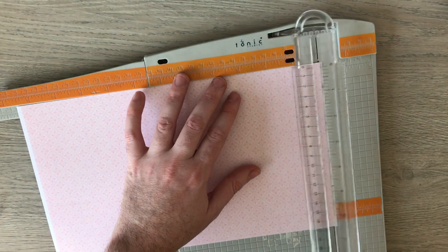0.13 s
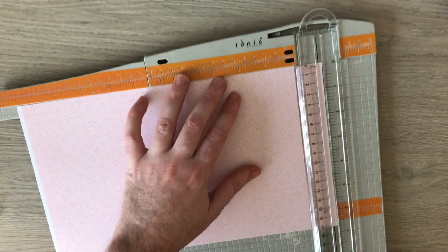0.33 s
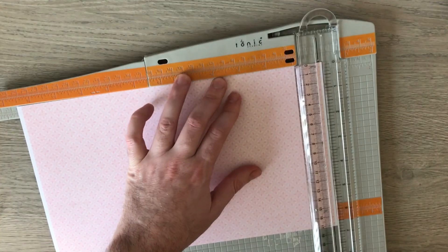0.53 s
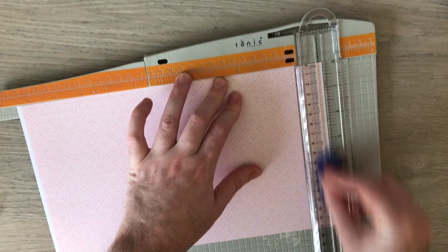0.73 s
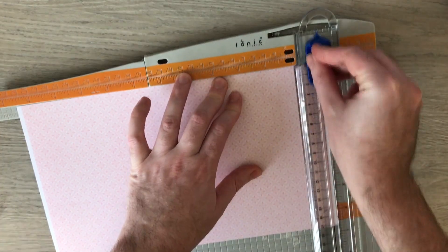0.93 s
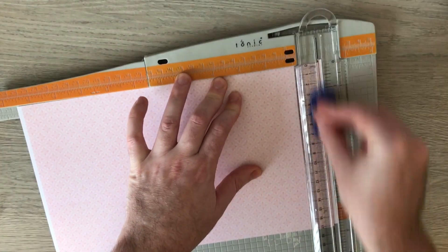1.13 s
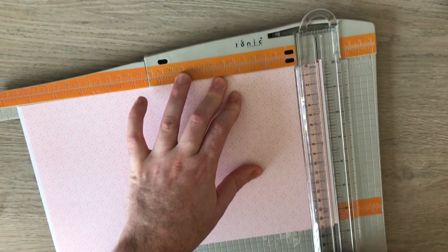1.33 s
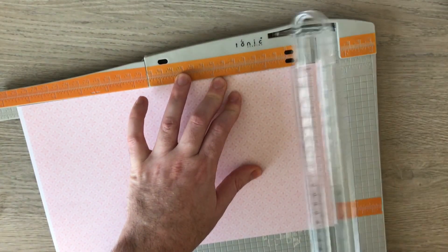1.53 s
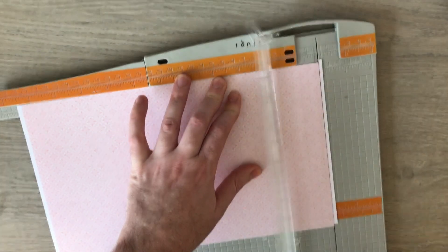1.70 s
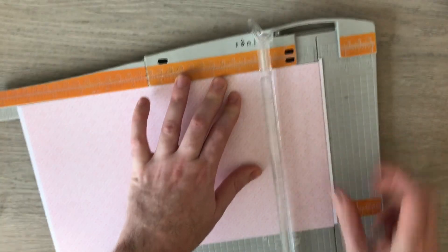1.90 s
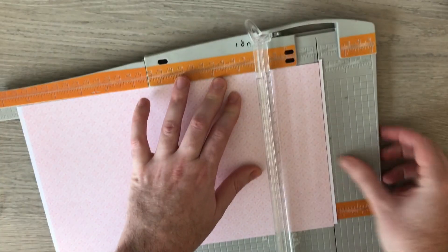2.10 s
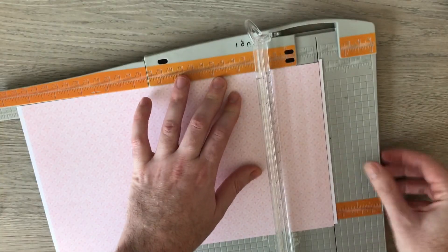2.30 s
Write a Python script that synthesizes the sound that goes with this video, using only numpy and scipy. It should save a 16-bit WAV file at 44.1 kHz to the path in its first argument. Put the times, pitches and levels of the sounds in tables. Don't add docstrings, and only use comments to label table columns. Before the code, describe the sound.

A paper trimmer's plastic rail squeaks faintly and slaps shut, the blade carriage hisses up through card and slides back more softly, then the rail flips open with rattling ticks; close phone microphone, small quiet room.

```python
import sys
import numpy as np
from scipy import signal
from scipy.fft import rfft, irfft
from scipy.io import wavfile
from scipy.ndimage import uniform_filter1d

SR = 44100
rng = np.random.default_rng(int(sys.argv[2]) if len(sys.argv) > 2 else 0)


def invert_db(x):
    u = np.asarray(x, float) / 20
    return 10 ** u


def dump_mix(stems):
    frames = np.atleast_2d(stems).T
    limited = np.clip(frames, -1, 1)
    pcm = np.round(limited * 32767).astype(np.int16)
    wavfile.write(sys.argv[1], SR, pcm)


N = 103635
T = np.arange(N) / SR


def hiss():
    return rng.standard_normal(N)


def unit(x):
    return x / np.sqrt(np.mean(x ** 2))


def colour(x, tone):
    hz, db = np.array(tone, float).T
    octaves = np.log2(np.fft.rfftfreq(N, 1 / SR) + 1)
    below = np.maximum(np.log2(hz[0]) - octaves, 0)
    gain = invert_db(np.interp(octaves, np.log2(hz), db) - 24 * below)
    return irfft(rfft(x) * unit(gain), N)


def ring(x, modes):
    t = T[:SR // 2]
    response = 0
    for k, (hz, db, t60) in enumerate(modes):
        fade = 1000. ** (-t / t60) / np.sqrt(t60)
        response = response + (-1) ** k * invert_db(db) * np.sin(2 * np.pi * hz * t) * fade
    return signal.fftconvolve(x, response / np.sqrt(np.sum(response ** 2)))[:N]


def damped(modes, share):
    return [(hz, db, share * t60) for hz, db, t60 in modes]


def bursts(times, dbs, t60, rise_s):
    level = np.zeros(N)
    for start, db in zip(times, dbs):
        age = np.maximum(T - start, 0)
        level += invert_db(db) * (1 - np.exp(-age / rise_s)) * 1000. ** (-age / t60)
    return level * np.sign(hiss())


def walk(rate):
    k = int(SR / rate)
    return unit(uniform_filter1d(uniform_filter1d(hiss(), k), k))


def curve(times, dbs):
    return invert_db(np.interp(T, times, dbs, left=-120, right=-120))


# pitch in Hz, level in dB.
AIR_TONE = [(15, -36), (25, -3.5), (120, -8.5), (170, -11.5), (624, -25.5), (1100, -18.5), (1290, -28),
            (1610, -30), (16000, -43.5)]


def quiet_air():
    return invert_db(-60 + 0.64 * walk(16)) * colour(hiss(), AIR_TONE)


# pitch in Hz, level in dB, extra level in the hum in dB.
HINGE_TONES = [(935, -3, 0), (1865, -24, -20), (711, -18, 7), (1350, -24, -15), (1160, -22, -10)]


def squeak():
    start_s, end_s, chirp_width_s = 0.032, 0.132, 0.011
    chirp = np.exp(-((T - start_s) / chirp_width_s) ** 2)
    humming = (T > start_s) * (T < end_s)
    hum = uniform_filter1d(invert_db(-16 + 2 * walk(40)) * humming, size=300)
    rub = 0
    for hz, db, hum_db in HINGE_TONES:
        wobbly_time = T + 0.00005 * walk(40)
        rub = rub + invert_db(db) * (chirp + invert_db(hum_db) * hum) * np.sin(2 * np.pi * hz * wobbly_time)
    return invert_db(-46 + 3.5) * rub


# pitch in Hz, level in dB, time to fade by 60 dB in seconds.
TABLE_MODES = [(65.5, -22, 0.21), (130.9, 6, 0.23), (175.3, -6, 0.073), (208.5, -1, 0.14),
               (287.5, -6, 0.15), (370, -10.5, 0.062)]


def thud(times, dbs):
    push_s = 0.0024
    pushes = 0
    for start, db in zip(times, dbs):
        pushes = pushes + invert_db(db) * np.sin(np.pi * np.clip((T - start) / push_s, 0, 1)) ** 2
    return signal.lfilter(*signal.butter(2, 80, "high", fs=SR), ring(pushes, TABLE_MODES))


# time in seconds, board level in dB, crack level in dB.
FALL = [
    (.17, -78, -85),
    (.195, -66, -74),
    (.21, -54, -62),
    (.216, -60, -66),
    (.22, -63, -54),
    (.226, -62, -64),
    (.233, -56, -54),
    (.24, -58, -60),
]
# start in seconds, crack level in dB, board level in dB, table level in dB.
SLAP = [
    (0.2408, -4, -30.5, -23),
    (0.2459, -18.5, -26, -34),
    (.2595, -32, -27.5, -41),
]
# pitch in Hz, level in dB.
SLAP_TONE = [(290, -60.5), (500, -14), (1110, 0.5), (3660, -5), (5970, -10.5), (8820, -13), (10500, -13.5),
             (12800, -10.5), (15700, -17.5)]
# pitch in Hz, level in dB.
SHIVER_TONE = [(180, -19.5), (300, -5.5), (372, -4), (477, -11), (824, 2), (1400, -2.5), (6110, -12.5),
               (10300, -24.5), (13500, -24.5), (15700, -25.5)]
# pitch in Hz, level in dB, time to fade by 60 dB in seconds.
BOARD_MODES = [(583, -7.5, 0.036), (689, -2.5, 0.054), (813, 1, 0.024), (1008, 5, 0.029), (1158, 4, 0.0097),
               (1345, 5, 0.031), (1419, 4, 0.04), (1800, 1.5, 0.024), (1879, -2, 0.046), (2023, 0.5, 0.023),
               (2370, -8, 0.0071), (2675, -16.5, 0.13), (3370, -17.5, 0.018), (4165, -11.5, 0.0066)]
# pitch in Hz, level in dB, time to fade by 60 dB in seconds.
RAIL_MODES = [(6400, 17, .012), (5250, -12.5, 0.035), (1060, -31, .015), (2210, -3.5, .012),
              (3110, -29.5, 0.0053), (8150, 10, 0.0088)]


def slap():
    start, crack, board, table = np.array(SLAP).T
    when, rub, fizz = np.array(FALL).T
    rise_s = 0.0007
    bright = bursts(start, crack, 0.021, rise_s) + curve(when, fizz) * hiss()
    dull = invert_db(11.5) * bursts(start, board, 0.0078, rise_s) + curve(when, rub) * hiss()
    shiver = colour(bursts(start[:1], [-25], 0.33, 0.00078), SHIVER_TONE)
    rail = ring(bursts(start[:1], [-4], 0.0067, rise_s), RAIL_MODES)
    return colour(bright, SLAP_TONE) + ring(dull, BOARD_MODES) + thud(start, table) + shiver + rail


def edge_click():
    age = (T - 0.2424) / 0.00004
    return invert_db(-4) * (1 - age ** 2) * np.exp(-age ** 2 / 2)


# time in seconds, level in dB.
PUSH = [(0.27, -23), (0.38, -42), (0.44, -53.5), (0.604, -43), (0.712, -27), (0.798, -35), (0.994, -30),
        (1.074, -50.5), (1.15, -40.5), (1.188, -30), (1.34, -36), (1.41, -46), (1.442, -43), (1.614, -45),
        (1.722, -19.5), (1.972, -31), (1.998, -29), (2.16, -29.5), (2.182, -30), (2.26, -43), (2.36, -59)]


def hand_on_table():
    push = curve(*np.array(PUSH).T)
    legs = invert_db(-14) * ring(np.sqrt(push * invert_db(-55.5)) * hiss(), [(57.4, 0, 0.15)])
    return invert_db(-11.0) * ring(push * invert_db(0.83 * walk(21)) * hiss(), TABLE_MODES) + legs


def patchy(x, edges_hz):
    spectrum, hz = rfft(x), np.fft.rfftfreq(N, 1 / SR)
    total = 0
    for low, mid, high in zip(edges_hz, edges_hz[1:], edges_hz[2:]):
        band = np.clip(np.minimum((hz - low) / (mid - low), (high - hz) / (high - mid)), 0, 1)
        flicker_db = 1.8 * (walk(22) + walk(90))
        total = total + invert_db(flicker_db) * irfft(spectrum * band, N)
    return total


# time in seconds, hiss level in dB, board level over the hiss in dB,
# board brightness in dB per octave.
SLIDE = [(0.34, -88, 3, -5), (0.42, -64, 8.5, 12), (0.5, -57, 10, 0.5), (0.59, -50, 7.5, -1),
         (0.685, -47.5, -4, -3), (0.693, -37.5, 5, 5.5), (0.79, -38, 0, -4), (0.85, -37.5, 5, 9),
         (0.9, -39, 7.5, 3.5), (0.94, -44.5, 7, 1), (0.968, -51, 10, 2), (0.98, -64, 13, 7.5),
         (1.15, -56, 9.5, 4.5), (1.228, -47, -1.5, -7.5), (1.294, -46.5, -1, -8.5), (1.34, -49.5, -1, -5),
         (1.39, -46.5, 5, -2), (1.442, -52, 5.5, -7), (1.485, -56.5, 3.5, -4), (1.508, -76, 20.5, -5),
         (1.601, -72.5, 10.5, -10)]
# pitch in Hz, level in dB.
HISS_TONE = [(180, -22), (300, -19), (501, -26), (698, -16), (1400, -15), (1520, 2), (3000, -1.5),
             (4610, -9.5), (15700, -1)]
# pitch in Hz, level in dB, time to fade by 60 dB in seconds.
BLADE_MODES = [(3040, -1, 0.0055), (3690, -5, 0.022), (4260, -9.5, 0.0042), (5880, 1.5, 0.0026),
               (6530, -6, 0.031), (7160, -6, 0.0066), (8770, -5, 0.0078), (12740, -8, 0.0037),
               (13400, -7.5, 0.0029), (14330, -14, .003)]
TEAR_BANDS_HZ = [1, 700, 1500, 2500, 3500, 5000, 6500, 8500, 11000, 13500, 16000, 22000]


def slide():
    when, level, board_over, tilt = np.array(SLIDE).T
    rough = curve(when, level) * invert_db(0.7 * walk(30) + 0.9 * walk(300))
    tearing = patchy(rough * hiss(), TEAR_BANDS_HZ)
    bite = bursts([0.688], [-36], 0.05, 0.00076)
    open_hiss = colour(tearing + bite, HISS_TONE)
    blade = 0
    for mode in BLADE_MODES:
        blade = blade + invert_db(mode[1] + 2.07 * walk(36)) * ring(rough * hiss(), [mode])
    board = 0
    for hz, db, t60 in BOARD_MODES:
        swell = invert_db(db + 3.17 * walk(25))
        rub = curve(when, level + board_over + tilt * np.log2(hz / 1400)) * hiss()
        board = board + swell * ring(rub, [(hz, db, 1.36 * t60)])
    return invert_db(1.5) * open_hiss + invert_db(-9.0) * blade + invert_db(-17) * board


# start in seconds, crack level in dB, board level over the crack
# in dB, table level in dB, treble level over the crack in dB.
RATTLE = [(1.358, -52, 6, -83, -6), (1.386, -50, 4, -84, 2), (1.445, -44, 24.5, -53, -8),
          (1.629, -44, 12.5, -56, -2), (1.6515, -63, 29, -48, -10), (1.6725, -52, 30, -68, -10),
          (1.6951, -15, 10.5, -45, 2), (1.7082, -15.5, 9, -32.5, 6), (1.7163, -27.5, 15.5, -72, 0),
          (1.724, -30, 5, -65, 12), (1.7526, -23, 12, -69, 6), (1.7732, -36, -7, -36.5, 15),
          (1.79, -26, 4, -44, 1), (1.8055, -43.5, 1, -60, 20), (1.808, -37, -5, -60, 5),
          (1.844, -45, -13, -54, -7), (1.8547, -22.5, 1, -55, -1), (1.8629, -23.5, 1.5, -57, 0),
          (1.8706, -29, 8, -39.5, 9), (1.8799, -27, -6, -44, 1), (1.898, -29.5, 14.5, -60, 0),
          (1.9396, -40.5, 15, -67, 11.5), (1.9625, -26.5, -15, -42, -6), (1.9725, -34, -13, -47, -5),
          (1.9804, -35, -12, -50, -1), (1.988, -43, -10, -72, 4), (1.9954, -47.5, 31.5, -39.5, -3),
          (2.0128, -48, -10, -45, 4), (2.0472, -30.5, 14, -45, 5), (2.0547, -29.5, 4, -68, 7),
          (2.0663, -26.5, 3, -39, -6), (2.106, -30, 2, -63, 3), (2.111, -28.5, 1, -62, -13),
          (2.1236, -35.5, 10.5, -62, -3), (2.132, -36.5, 8, -65, -6), (2.1588, -48, 14, -60, -4),
          (2.169, -41.5, 15.5, -49.5, -6), (2.2787, -57, 4, -57, -8)]
# pitch in Hz, level in dB.
TICK_TONE = [(880, -14), (1500, -6.5), (2440, -6), (2880, -1), (3280, -9), (7170, -13), (7690, -16),
             (14300, -21.5), (16000, -20)]
# time in seconds, level in dB, bright share in dB.
CHATTER = [
    (1.625, -80, -10),
    (1.635, -43.5, -13),
    (1.655, -35.5, -24),
    (1.692, -41.5, -17.5),
    (1.698, -20, -7.5),
    (1.718, -42.5, 7.5),
    (1.784, -32, -9.5),
    (2.076, -38.5, -13.5),
    (2.211, -48.5, -7),
    (2.36, -75, -5),
]
# pitch in Hz, level in dB.
CHATTER_TONE = [(880, -10), (1500, -6), (2900, -2), (4500, -5), (6500, -10.5), (8500, -14.5),
                (12000, -17.5), (16000, -23)]


def rattle():
    start, crack, board_over, table, treble = np.array(RATTLE).T
    low, high = (signal.butter(2, 7000, side, fs=SR) for side in ("low", "high"))
    t60, rise_s = 0.035, 0.0015
    body = signal.lfilter(*low, bursts(start, crack - 1.5, t60, rise_s))
    sparkle = signal.lfilter(*high, bursts(start, crack + treble - 1.5, 0.68 * t60, rise_s))
    ticks = colour(body + sparkle, TICK_TONE)
    when, db, bright = np.array(CHATTER).T
    shake = invert_db(2 * walk(87) + 2 * walk(450))
    dull = ring(curve(when, db - 3.0) * shake * hiss(), BOARD_MODES)
    fizz = colour(curve(when, db + bright - 2.5) * shake * hiss(), CHATTER_TONE)
    knocks = ring(bursts(start, crack + board_over - 5, 0.045, 0.0061), damped(BOARD_MODES, 0.68))
    return ticks + fizz + dull + knocks + thud(start, table + 3)


# start in seconds, crack level in
# dB, # board level over the crack in dB.
TOUCHES = [
    (2.0478, -31, 5),
    (2.115, -41, -3),
    (2.2795, -50, -1.5),
    (1.362, -43, 6),
    (1.381, -44, 8),
    (1.756, -34, 10),
    (1.6535, -56, 22),
    (1.678, -54, 18),
]


def touches():
    start, crack, board_over = np.array(TOUCHES).T
    ticks = colour(bursts(start, crack, 0.04, 0.0004), TICK_TONE)
    return ticks + ring(bursts(start, crack + board_over, 0.04, 0.0004), damped(BOARD_MODES, 0.3))


def room(x):
    gap_s, t60, dark_hz = 0.014, 0.17, 5900
    age = np.maximum(T[:SR // 2] - gap_s, 0)
    noise = rng.standard_normal(SR // 2)
    low = signal.lfilter(*signal.butter(1, dark_hz, fs=SR), noise)
    tail = low * 1000. ** (-age / t60) + (noise - low) * 1000. ** (-age / (0.12 * t60))
    tail = signal.lfilter(*signal.butter(2, 400, "high", fs=SR), (age > 0) * tail)
    return invert_db(-15.5) * signal.fftconvolve(x, tail / np.sqrt(np.sum(tail ** 2)))[:N]


def scene():
    near = rattle() + slide() + hand_on_table() + squeak() + touches()
    air = quiet_air()
    return (slap() + edge_click() + near + room(near) + air)[None]


def roll_off(x):
    return signal.sosfilt(signal.butter(12, 17030, fs=SR, output="sos"), x)


def record(dry):
    hz = np.fft.rfftfreq(N, 1 / SR)
    dip_db = -4.5 * np.exp(-((hz - 10480) / 450) ** 2)
    dipped = irfft(rfft(dry) * invert_db(dip_db), N)
    heard = signal.lfilter(*signal.butter(2, 45, "high", fs=SR), dipped)
    top_cut = signal.ellip(12, 0.3, 70, 15700, fs=SR, output="sos")
    mix = np.clip(signal.sosfilt(top_cut, heard), -1, 1)
    return roll_off(mix)


dry = scene()
out = record(dry)
dump_mix(out)
```